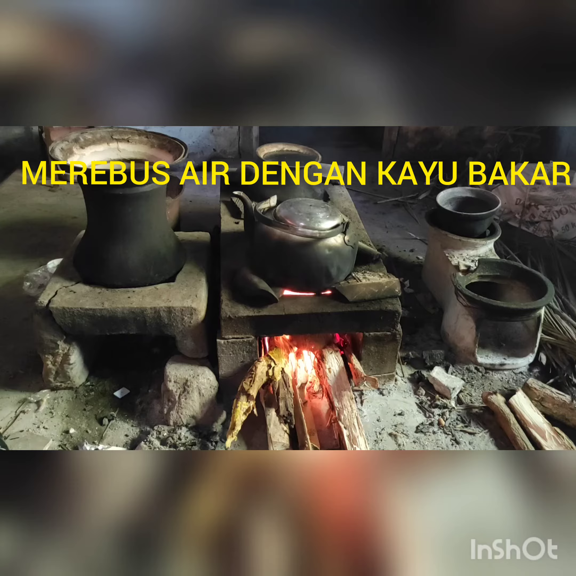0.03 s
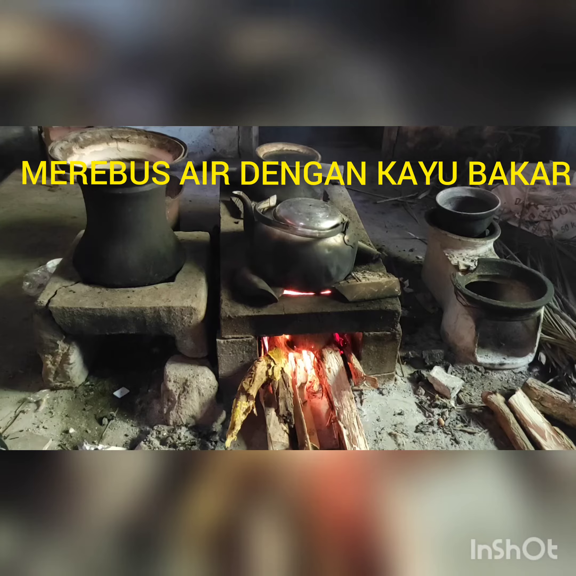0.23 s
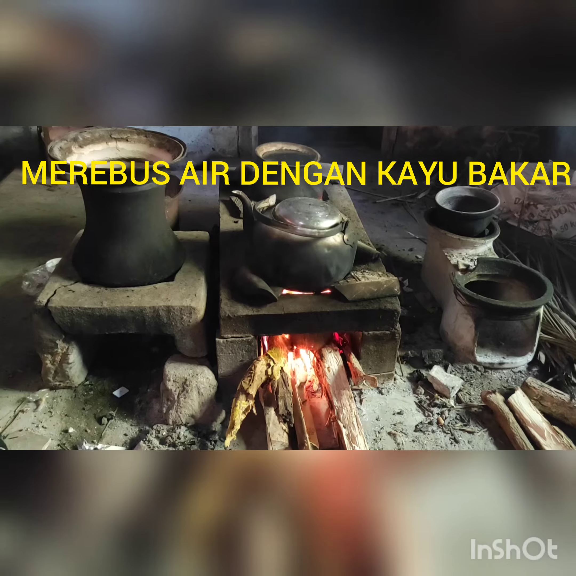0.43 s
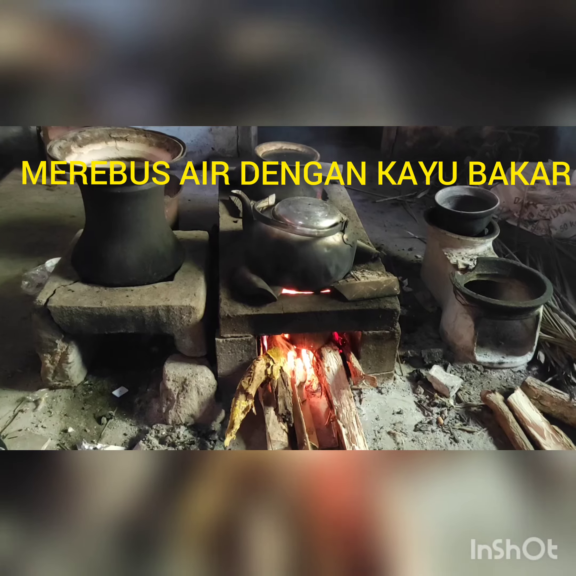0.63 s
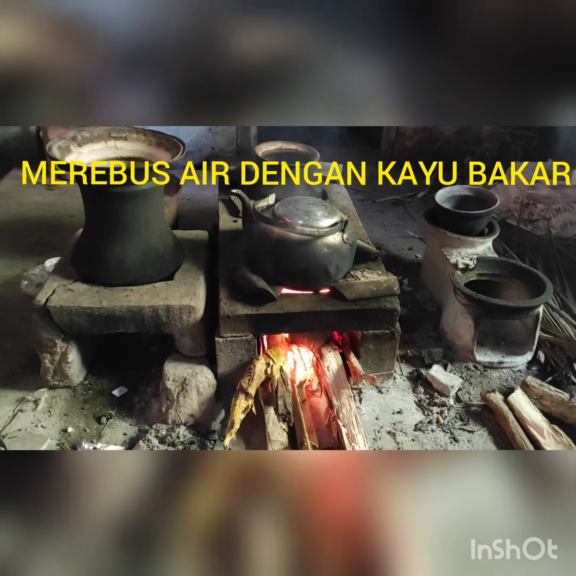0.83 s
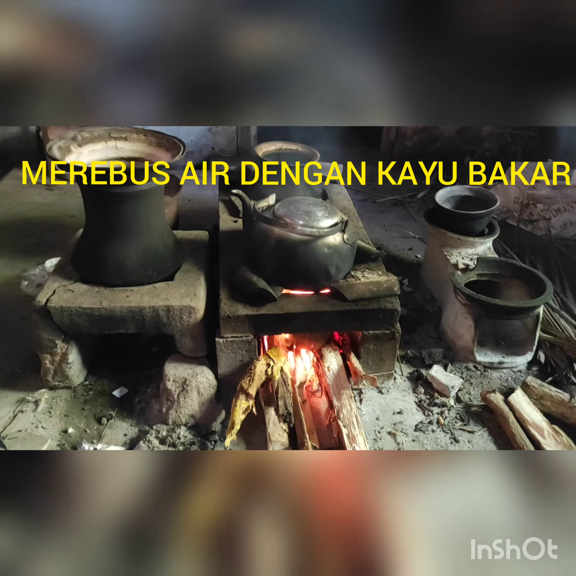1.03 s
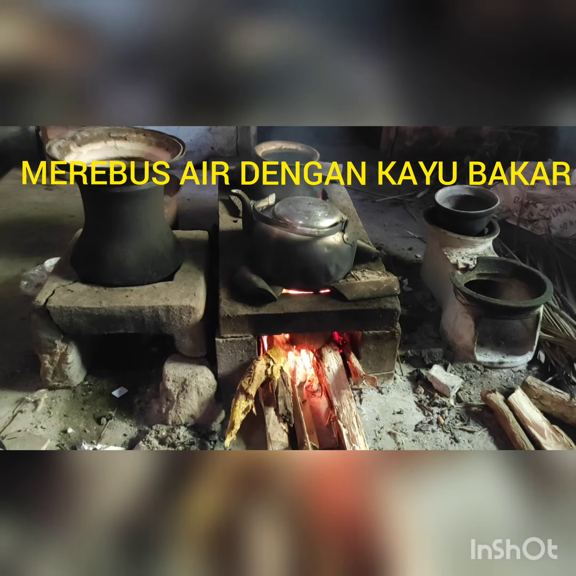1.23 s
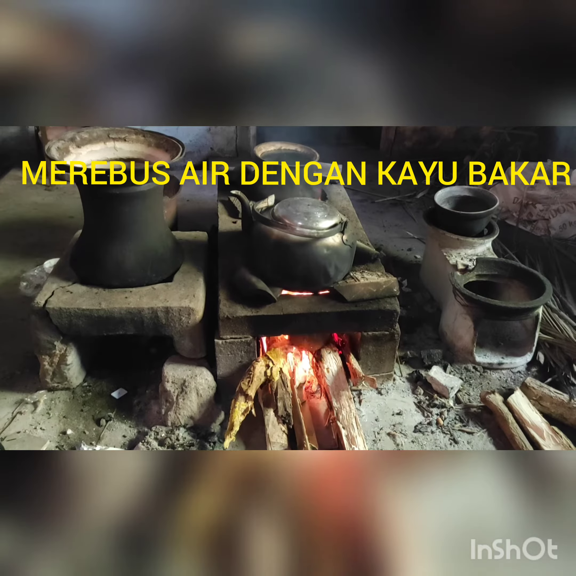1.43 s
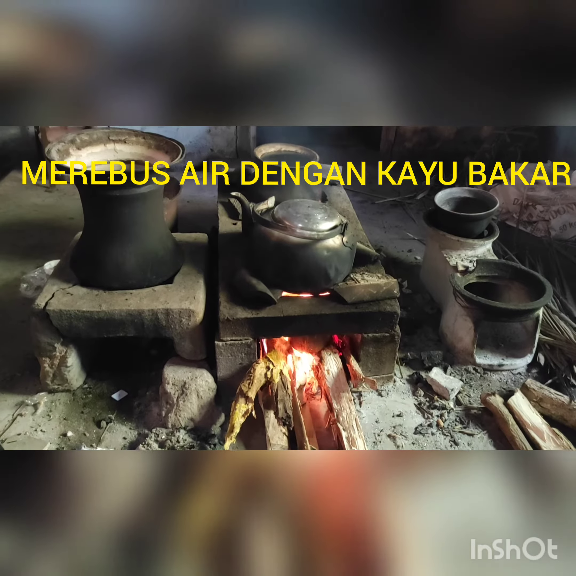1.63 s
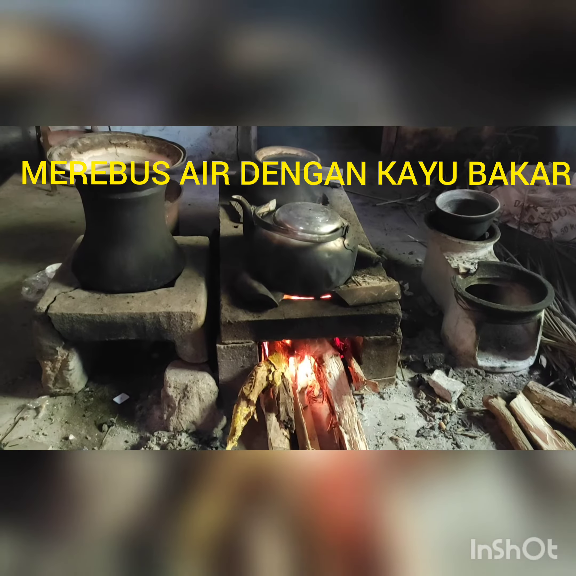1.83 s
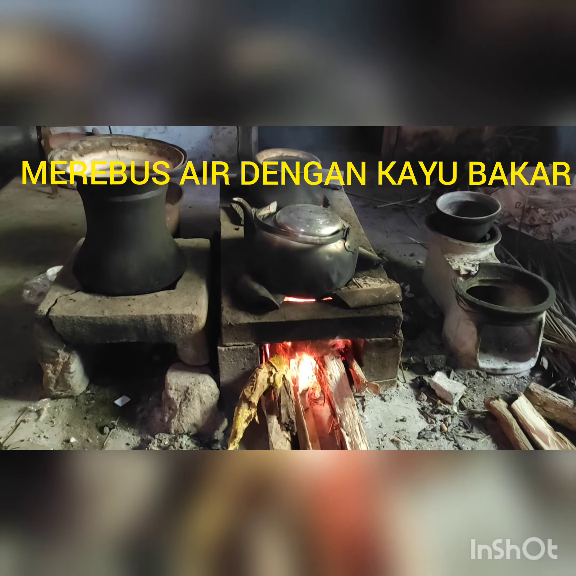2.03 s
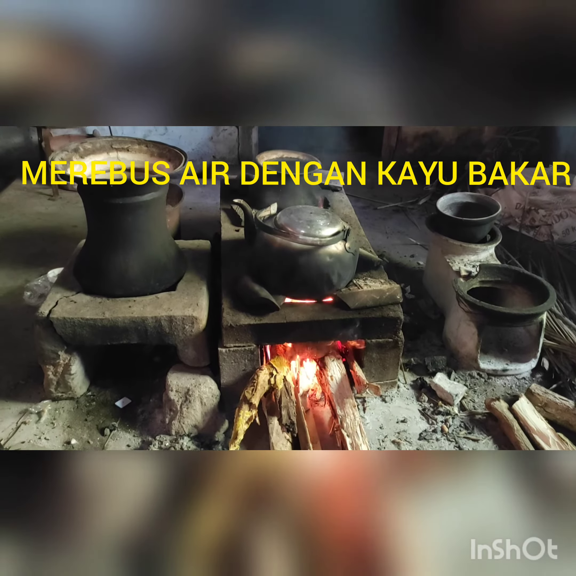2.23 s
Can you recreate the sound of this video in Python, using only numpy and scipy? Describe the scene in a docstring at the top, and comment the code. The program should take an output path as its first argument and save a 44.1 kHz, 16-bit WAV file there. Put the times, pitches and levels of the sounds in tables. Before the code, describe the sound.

A wood fire crackles close by in a small room, fading in at 0.1 s. Low flames flutter and puff over faint rumble and bright sap hiss, with fine ticks throughout. Four dull clicks come by 0.3 s; crisp snaps stand out at 0.6, 1.1 and 1.6 s, the strongest at 1.83 s. Faint birds repeat falling peeps, with thin held whistles from 0.4 and 1.9 s.

```python
"""Flames flutter low in a clay stove's firebox as coloured noise, with a faint hum; sap hisses, wood ticks.
From 0.1 s the wood snaps, as short noise bursts; a low rumble and four dull clicks join.
From 0.12 s a farther bird repeats a falling peep, a gliding sine; at 0.42 s another holds a thin whistle.
The strongest snap falls at 1.83 s, the second whistle at 1.86 s; a small room answers snaps, ticks and birds."""
import sys
import numpy as np
from scipy import signal
from scipy.fft import rfft, irfft
from scipy.io import wavfile
from scipy.ndimage import uniform_filter1d

SR = 44100
rng = np.random.default_rng(int(sys.argv[2]) if len(sys.argv) > 2 else 0)


def dump(signal):
    """Clip the signal to [-1, 1] and save it as 16-bit WAV at the path in sys.argv[1]."""
    limited = np.clip(np.atleast_2d(signal).T, -1, 1)
    pcm = np.round(limited * 32767).astype(np.int16)
    wavfile.write(sys.argv[1], SR, pcm)


N = 101429
T = np.arange(N) / SR

# Draught of the flames. Each row: time in seconds, level in dB (only departures from the mean count).
DRAUGHT = [(.1, -65), (.25, -60.5), (.36, -64), (.45, -56), (.6, -55), (.66, -60.5), (0.758, -48),
           (.92, -56.5), (1.05, -58.5), (1.17, -59.5), (1.26, -56), (1.38, -59.5), (1.55, -62), (1.72, -59),
           (1.81, -61.5), (1.901, -50.5), (2.03, -60.5), (2.17, -58), (2.3, -59.5)]
# Firebox spectrum. Each row: frequency in Hz, level in dB.
FIREBOX_SPECTRUM = [(20, -21), (80, -13.5), (120, -5), (165, 3), (212, 2), (265, -5), (357, -6.5),
                    (468, -10.5), (530, -12), (700, -16.5), (900, -20.5), (1300, -22.5), (2000, -25),
                    (3200, -31)]
# Firebox resonances. Each row: frequency in Hz, width in Hz, boost in dB.
FIREBOX_MODES = [(215, 15, 3.5), (474, 20, 8), (570, 17, 3), (1144, 53, 4)]
# How far each band follows the draught. Each row: frequency in Hz, share of the draught's dB.
DRAUGHT_SHARE = [(30, 0.054), (100, 0.24), (200, 1.07), (450, 0.56), (900, 0.52), (2500, 0.46)]
# Middle range of the flames. Each row: time in seconds, boost in dB.
MIDDLE_LEVEL = [(.1, 3.5), (.22, -4), (.33, 4), (.55, 0.5), (.8, 2), (1.13, 3), (1.33, 4), (1.46, 9.5),
                (1.53, 1.5), (1.9, 4.5), (2.12, 2), (2.26, 6)]
# Puffs of flame. Each row: centre in seconds, swing level in dB, ring in Hz.
PUFFS = [(0.535, -51, 190.9), (0.58, -57, 190), (0.714, -40.5, 211), (0.749, -42, 215), (0.78, -48, 230),
         (0.828, -47, 220), (0.877, -41.5, 203), (1.226, -45, 195.6), (1.297, -43.5, 182.5),
         (1.435, -51.5, 171), (1.759, -52, 201.6), (1.87, -43, 192.7), (1.917, -42, 170),
         (1.965, -52, 187.5)]
FLAME_DB, FLUTTER_DB, FLUTTER_HZ = -55, 1.44, 29.6
PUFF_S, PUFF_NOISE_DB, PUFF_PAN_DB = 0.0067, 7.5, 7  # noise lift is per puff, before its filter

HUM_HZ, HUM_DB, HUM_DRIFT_HZ, HUM_WAVER_DB, HUM_PAN_DB = 478.3, -79.5, 6.25, 2, 6

# Sap hiss spectrum. Each row: frequency in Hz, level in dB.
HISS_SPECTRUM = [(880, -20), (1500, -8.5), (2200, -6), (3000, -5), (4300, -3), (5000, -8), (5600, -5),
                 (6150, 2.5), (7300, -0.5), (8300, 4), (9400, -6.5), (10100, -20.5), (12500, -22.5),
                 (15500, -31)]
# Sap hiss level. Each row: time in seconds, level in dB.
HISS_LEVEL = [(.1, -70.5), (.3, -62), (.58, -64), (.74, -60), (.9, -63), (1.25, -63), (1.36, -60.5),
              (1.55, -62), (1.75, -61.5), (2.05, -63.5), (2.3, -63)]

# Tick spectrum. Each row: frequency in Hz, gain in dB.
TICK_SPECTRUM = [(500, -10), (3000, -26), (5500, -19), (7400, -6), (9000, -1), (10500, -34), (15000, -40)]
TICKS_PER_S, TICK_DB, TICK_SPREAD_DB = 170, -86.5, 11

# Snaps of the wood. Each row: start in seconds, level in dB, band centre in Hz, left-right difference in dB,
# decay length in seconds, dull share in dB.
SNAPS = [(0.105, -53, 7950, -2, 0.0043, -25), (0.256, -48, 8500, 15, 0.0017, -29),
         (0.361, -47, 8300, 11, 0.0014, -23), (0.5994, -33.5, 8060, 0.5, 0.0055, -26),
         (0.7085, -39, 8640, 7, 0.0026, -32), (0.726, -48, 8200, 10, 0.0029, -28),
         (0.806, -48, 8350, -11, 0.0029, -10), (0.931, -41, 7640, 3, 0.0032, -19),
         (0.9766, -46, 9150, 5, 0.002, -13), (1.037, -49, 7900, 2, 0.0013, -39),
         (1.1212, -36.5, 8070, 9, 0.0039, -37), (1.1718, -45.5, 8000, 2, 0.0021, -43),
         (1.333, -44.5, 8150, 7, 0.011, -32), (1.403, -40.5, 7500, -7.5, 0.0017, -43),
         (1.418, -47, 7300, -13, 0.002, -38), (1.448, -48, 7340, -14, 0.0028, -40),
         (1.46, -45.5, 7150, -11, 0.0017, -32), (1.5750, -35.5, 8350, 9, 0.0033, -39),
         (1.829, -38, 7400, -13, 0.0052, -22), (1.8342, -24, 7210, 0, 0.0054, -35.5),
         (1.85, -48, 7500, -7, 0.0024, -33), (1.867, -58, 7440, -17, 0.0015, -47),
         (2.042, -47, 7560, -3, 0.002, -31)]
# Broad part of a snap. Each row: frequency in Hz, level in dB above the dull share.
DULL_SPECTRUM = [(150, 0), (600, 2), (1500, 13), (3000, 7), (4500, 12), (9000, 17.5), (11000, -2),
                 (15000, -4)]
SNAP_BAND_SCALE_HZ, SNAP_SKIRT_POWER = 1420, 3.2
SNAP_RISE = 0.39  # share of the decay length

# Low rumble spectrum. Each row: frequency in Hz, level in dB.
RUMBLE_SPECTRUM = [(20, 2.5), (38, -12), (49, 5.5), (62, -9.5), (90, -7.5), (120, -16.5), (200, -30),
                   (600, -61.5)]
# Low rumble level. Each row: time in seconds, level in dB.
RUMBLE_LEVEL = [(.1, -93), (.18, -46), (.3, -58.5), (.6, -53), (1.0, -52), (1.3, -52.5), (1.45, -57),
                (1.9, -59), (2.3, -59)]
SETTLE_START_S, SETTLE_PEAK_S, SETTLE_DB, SETTLE_PAN_DB = 0.12, 0.13, -31, 9.5  # peak counts from start

# Falling peeps. Each row: start in seconds, length in seconds, level in dB before the bird gains,
# first pitch in Hz, last pitch in Hz, level of the fall against the start in dB.
PEEPS = [(0.124, 0.24, -74, 4830, 2188, 6.5), (0.685, 0.24, -70.5, 4600, 2640, 5),
         (1.153, 0.19, -70, 4600, 2310, 6), (1.605, .215, -69.5, 4830, 2234, 4.5),
         (2.037, .235, -75, 4666, 2754, 7.5)]
# Short low peeps. Each row: start in seconds, length in seconds, first pitch in Hz, last pitch in Hz,
# level in dB before the bird gains.
CHIPS = [(1.189, 0.039, 3555, 3170, -74), (1.961, .06, 3110, 2750, -74)]
# Held whistles, one list per call. Each row: time in seconds, pitch in Hz, level in dB before the bird gains.
WHISTLES = [
    [(.42, 4427, -71), (.50, 4330, -78), (.55, 4294, -67.5), (.61, 4437, -68.5), (.7, 4356, -61.5),
     (.79, 4375, -68), (.83, 4383, -60), (.88, 4280, -74)],
    [(1.86, 4396, -71), (1.93, 4424, -77), (2.06, 4340, -71), (2.11, 4340, -66.5), (2.18, 4150, -68),
     (2.22, 4120, -58)],
]
PEEP_KNEE_HZ, PEEP_DROP_HZ = 4150, 3662  # pitch before and after the break
PEEP_KNEE, PEEP_BREAK = 0.54, 0.03956  # shares of the call: start and length of the break
PEEP_SCATTER_HZ, PEEP_RASP_HZ = 30, 260.5  # the rasp adds to the scatter in the fall
PEEP_FLICKER_DB, PEEP_FLICKER_HZ = 3.5, 45.5
WHISTLE_WOBBLE_HZ, WHISTLE_RATE_HZ, WHISTLE_FLICKER_DB = 49, 74, 1.5
BIRD_ROOM_DB, BIRD_DIRECT_DB, BIRD_PAN_DB = -0.5, -16, 1

# Dull clicks. Each row: start in seconds, level in dB before colouring.
KNOCKS = [(0.128, -53), (0.1886, -43.5), (0.2496, -48.5), (.2895, -45)]
# Colour of the dull clicks. Each row: frequency in Hz, gain in dB.
KNOCK_COLOUR = [(3000, 1), (6000, -2), (9500, 2), (11000, -27), (15000, -34)]
KNOCK_S, KNOCK_PAN_DB = 0.00043, 6

# Likeness of left and right noise. Each row: frequency in Hz, correlation.
LIKENESS = [(60, 0.27), (130, 1), (290, 0.69), (640, 0.58), (1410, -0.11), (3100, -0.017), (6820, -0.17),
            (15000, 0.27)]
# Lean of the noise to the left. Each row: frequency in Hz, left-right difference in dB.
LEAN = [(60, 5), (200, 6), (700, 2.5), (1300, 3), (2400, 1), (5500, 0), (6500, -8), (7500, -3.5),
        (8700, 11), (15000, -2)]
# Decay of the room. Each row: frequency in Hz, time to fall 60 dB in seconds.
ROOM_T60 = [(200, 0.071), (2800, 0.6), (4500, 0.33), (8000, 0.22), (15000, 0.07)]
ECHOES_PER_S, ECHO_RISE_S, CRACKLE_ROOM_DB = 1700, 0.0093, -9.5
FADE_START_S, FADE_S, EDGE_HZ = 0.06, 0.049, 15750


def amp(db):
    """Decibels to gain."""
    return 10 ** (np.asarray(db) / 20)


def unit(x):
    """Scales to rms 1."""
    return x / np.sqrt(np.mean(x ** 2) + 1e-20)


def read(points, hz):
    """Interpolates a spectrum at hz, on a log frequency axis."""
    f, value = np.transpose(points)
    return np.interp(np.log(hz + 1), np.log(f + 1), value)


def follow(points, t):
    """Interpolates a time course at t."""
    return np.interp(t, *np.transpose(points))


def pan(db):
    """Left and right gains for a level difference, at constant power."""
    gains = np.array([amp(db / 2), amp(-db / 2)])
    return gains / np.sqrt((gains ** 2).mean(0))


def add(mix, start_s, sound):
    """Mixes a sound in at a time."""
    part = mix[:, max(round(start_s * SR), 0):][:, :sound.shape[1]]
    part += sound[:, :part.shape[1]]


def colour(x, points):
    """Filters by a spectrum."""
    size = x.shape[-1]
    gain = amp(read(points, np.fft.rfftfreq(size, 1 / SR)))
    return irfft(rfft(x) * gain, size)


def wander(size, hz):
    """Smooth random movement of rms 1, fading out above about hz."""
    f = np.fft.rfftfreq(N, 1 / SR)
    lowpass = np.exp(-(f / hz) ** 2) * (f > 0)
    return unit(irfft(rfft(rng.standard_normal(N)) * lowpass, N))[:size]


def stereo_noise(field, patch_db, size):
    """Partly correlated stereo noise, rms 1, shaped in dB by field(s, Hz) and random patches."""
    hop = size // 4
    t = np.arange(N // hop + 5) * hop / SR
    hz = np.fft.rfftfreq(size, 1 / SR)
    a, b, c, d, patch = rng.standard_normal((len(t), len(hz), 5)).T
    patch = uniform_filter1d(patch, size=7, axis=0)
    patch = unit(uniform_filter1d(patch, size=9, axis=1))
    same = np.clip(read(LIKENESS, hz), -1, 1)[:, None]
    left = a + 1j * b
    right = same * left + np.sqrt(1 - same ** 2) * (c + 1j * d)
    z = np.array([left, right]) * pan(read(LEAN, hz))[:, :, None]
    z = z * amp(field(t, hz[:, None]) + patch_db * patch)
    return unit(signal.istft(z, nperseg=size, noverlap=size - hop)[1][:, :N])


def room(x):
    """Tail of separate reflections off walls and pots, each band decaying at its own rate."""
    shape = (2, SR // 2)
    taps = rng.standard_normal(shape) * (rng.random(shape) < ECHOES_PER_S / SR)
    hz, t, z = signal.stft(taps, SR, nperseg=256)
    decay = amp(-60 * t / read(ROOM_T60, hz)[:, None])
    tail = signal.istft(z * decay, SR, nperseg=256)[1]
    tail = tail * np.minimum(np.arange(tail.shape[1]) / SR / ECHO_RISE_S, 1)
    tail = tail / np.linalg.norm(tail, axis=1, keepdims=True)
    return signal.fftconvolve(x[None], tail, axes=1)[:, :N]


def flames():
    """Turbulence rings the firebox and swells with the draught; each puff adds a few low swings."""
    def field(t, hz):
        modes = sum(g / (1 + (2 * (hz - f) / w) ** 2) for f, w, g in FIREBOX_MODES)
        middle = np.clip((hz - 250) / 500, 0, 1) * follow(MIDDLE_LEVEL, t)
        mean_db = np.transpose(DRAUGHT)[1].mean()
        draught = read(DRAUGHT_SHARE, hz) * (follow(DRAUGHT, t) - mean_db)
        rolloff = 20 * np.log10(1 + (hz / 3000) ** 4)
        return read(FIREBOX_SPECTRUM, hz) + modes + middle + draught - rolloff

    roar = stereo_noise(field, patch_db=1.5, size=2048)
    swell, swings = np.zeros(N), np.zeros(N)
    for centre_s, db, ring_hz in PUFFS:
        puff = np.exp(-((T - centre_s) / PUFF_S) ** 2)
        swell += puff
        swings += amp(db) * puff * np.sin(2 * np.pi * (ring_hz * T + rng.random()))
    low_roar = colour(roar, [(400, -9), (900, -29), (2000, -30)])  # (Hz, dB)
    roar = roar + low_roar * (amp(PUFF_NOISE_DB * swell) - 1)
    flutter = amp(FLAME_DB + FLUTTER_DB * wander(N, FLUTTER_HZ))
    return flutter * roar + swings * pan(PUFF_PAN_DB)[:, None]


def hum():
    """The draught holds one resonance of the stove in a faint, wavering note."""
    hz = HUM_HZ + HUM_DRIFT_HZ * wander(N, 14.1)
    note = np.sqrt(2) * np.sin(2 * np.pi * np.cumsum(hz) / SR)
    return note * amp(HUM_DB + HUM_WAVER_DB * wander(N, 27)) * pan(HUM_PAN_DB)[:, None]


def hiss():
    """Steam escapes from the wood in an unsteady jet: bright noise of changing level."""
    def field(t, hz):
        return read(HISS_SPECTRUM, hz) - 20 * np.log10(1 + (1400 / (hz + 1)) ** 2)

    jet = stereo_noise(field, patch_db=2.5, size=256)
    return jet * amp(follow(HISS_LEVEL, T) + 0.077 * wander(N, 140))


def ticks():
    """Tiny cells burst at random in the embers: clicks through four kinds of decaying noise burst."""
    chance, strength, side = rng.random((N, 3)).T
    spread = np.minimum(-np.log(strength + 1e-9), 3)
    clicks = (chance < TICKS_PER_S / SR) * amp(TICK_SPREAD_DB * spread)
    t = np.arange(150) / SR
    bursts = rng.standard_normal((4, 2, len(t))) * np.exp(-t / 0.00097)
    kind = rng.integers(0, 4, N)
    gains = pan(12 * (side - 0.5))
    out = np.zeros((2, N))
    for k in range(4):
        for channel in range(2):
            hits = clicks * (kind == k) * gains[channel]
            out[channel] += np.convolve(hits, bursts[k, channel])[:N]
    return amp(TICK_DB) * unit(colour(out, TICK_SPECTRUM))


def snaps():
    """Each snap is a few milliseconds of tearing fibres: a bright band over a broad, duller crack."""
    out, t = np.zeros((2, N)), np.arange(2048) / SR
    hz = np.fft.rfftfreq(len(t), 1 / SR)
    for start_s, db, centre_hz, side_db, length_s, dull_db in SNAPS:
        u = t / length_s
        env = np.minimum(u / SNAP_RISE, 1) * np.exp(-u ** 2)
        burst = rng.standard_normal((2, len(t))) * env
        tear = np.exp(1j * np.angle(rfft(burst)))  # phase only
        band = (1 + ((hz - centre_hz) / SNAP_BAND_SCALE_HZ) ** 2) ** -SNAP_SKIRT_POWER
        crack = amp(dull_db + read(DULL_SPECTRUM, hz))
        snap = irfft(tear * (band + crack))
        snap = snap * np.exp(-(u / 2) ** 2) * np.minimum(t / 0.00053, 1)
        snap = snap / abs(snap).max(1, keepdims=True)
        add(out, start_s, snap * amp(db) * pan(side_db)[:, None])
    return out


def rumble():
    """The deep part of the burning, and a slow settling of the microphone, below hearing."""
    u = np.maximum(T - SETTLE_START_S, 0) / SETTLE_PEAK_S
    settling = amp(SETTLE_DB) * (u * np.exp(1 - u)) ** 2 * pan(SETTLE_PAN_DB)[:, None]
    deep = stereo_noise(lambda t, hz: read(RUMBLE_SPECTRUM, hz), patch_db=2.0, size=4096)
    return settling + amp(follow(RUMBLE_LEVEL, T)) * deep


def whistle(hz, db):
    """One sine of moving pitch and level, tapered at both ends."""
    taper = signal.windows.tukey(len(hz), 0.15)
    return (np.sqrt(2) * taper * amp(db) * np.sin(2 * np.pi * np.cumsum(hz) / SR))[None]


def birds():
    """Nearly pure whistles, mostly heard by way of the room; each peep sinks, then drops with a rasp."""
    out = np.zeros((1, N))
    for start_s, length_s, db, first_hz, last_hz, fall_db in PEEPS:
        u = np.arange(0, length_s, 1 / SR) / length_s
        fall = np.clip((u - PEEP_KNEE) / 0.066, 0, 1)
        hz = np.interp(u, [0, PEEP_KNEE, PEEP_KNEE + PEEP_BREAK, 1],
                       [first_hz, PEEP_KNEE_HZ, PEEP_DROP_HZ, last_hz])
        hz = hz + (PEEP_SCATTER_HZ + PEEP_RASP_HZ * fall) * wander(len(u), 165)
        flicker = PEEP_FLICKER_DB * wander(len(u), PEEP_FLICKER_HZ)
        add(out, start_s, whistle(hz, db + fall_db * fall + flicker))
    for start_s, length_s, first_hz, last_hz, db in CHIPS:
        add(out, start_s, whistle(np.linspace(first_hz, last_hz, int(length_s * SR)), db))
    for call in WHISTLES:
        s, pitch_hz, level_db = np.transpose(call)
        t = np.arange(s[0], s[-1], 1 / SR)
        hz = np.interp(t, s, pitch_hz) + WHISTLE_WOBBLE_HZ * wander(len(t), WHISTLE_RATE_HZ)
        db = np.interp(t, s, level_db) + WHISTLE_FLICKER_DB * wander(len(t), 32)
        add(out, s[0], whistle(hz, db))
    heard = amp(BIRD_DIRECT_DB) * out + amp(BIRD_ROOM_DB) * room(out[0])
    return heard * pan(BIRD_PAN_DB)[:, None]


def knocks():
    """Faint dull clicks: a step of pressure that leaks away."""
    out, t = np.zeros((2, N)), np.arange(1000) / SR
    for start_s, db in KNOCKS:
        add(out, start_s, -amp(db) * np.exp(-t / KNOCK_S) * pan(KNOCK_PAN_DB)[:, None])
    return colour(out, KNOCK_COLOUR)


def scene():
    """Fire close by, its snaps and ticks echoing in the room, and the birds beyond."""
    crackle = ticks() + snaps()
    echo = amp(CRACKLE_ROOM_DB) * room(crackle.sum(0) / np.sqrt(2))
    return flames() + hum() + hiss() + crackle + echo + rumble() + birds() + knocks()


def record(dry):
    """A quick fade-in and a steep low-pass."""
    faded = dry * np.clip((T - FADE_START_S) / FADE_S, 0, 1)
    lowpass = signal.firwin(511, EDGE_HZ, window=("kaiser", 9), fs=SR)
    return signal.oaconvolve(faded, lowpass[None], "same")


dry = scene()
out = record(dry)
dump(out)
```